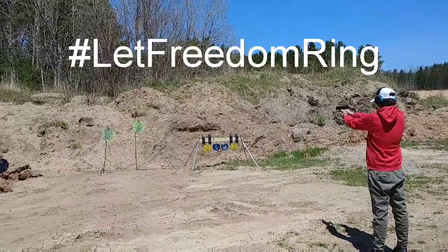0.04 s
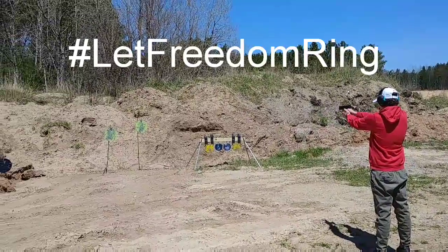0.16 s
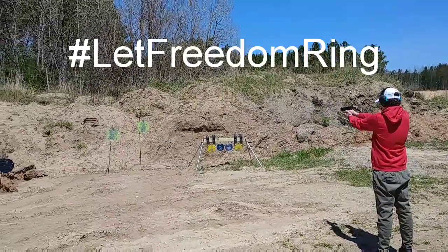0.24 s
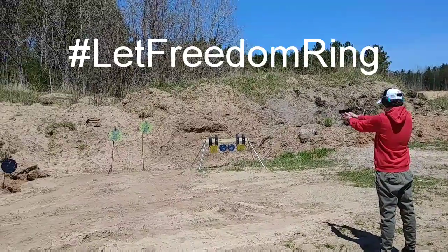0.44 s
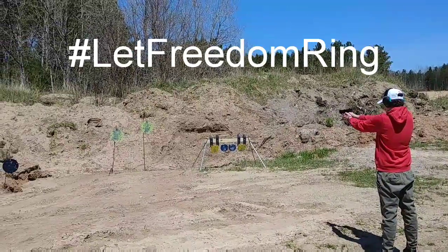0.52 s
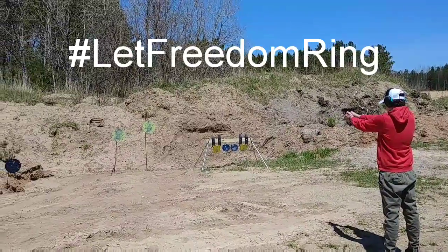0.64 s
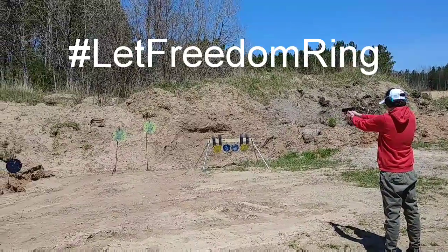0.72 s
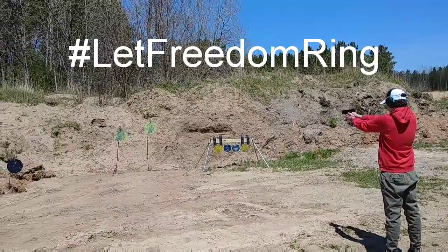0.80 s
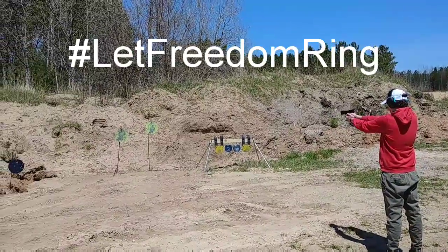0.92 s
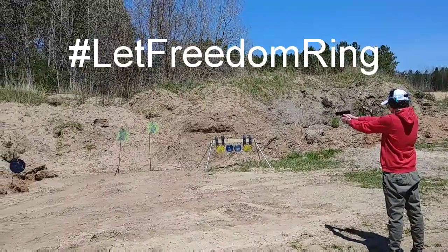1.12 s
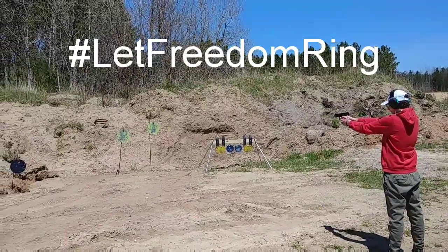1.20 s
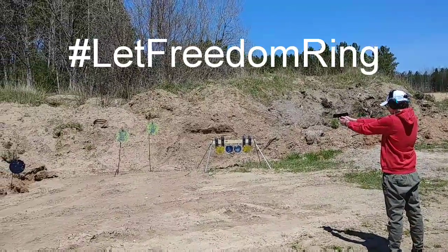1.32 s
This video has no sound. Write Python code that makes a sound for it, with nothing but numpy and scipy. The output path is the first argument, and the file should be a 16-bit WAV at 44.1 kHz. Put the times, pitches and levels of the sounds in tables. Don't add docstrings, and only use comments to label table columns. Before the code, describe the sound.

A handgun fires twice at an open dirt range, with bright metallic plate rings after each shot

```python
import sys
import numpy as np
from scipy import signal
from scipy.io import wavfile
from scipy.ndimage import uniform_filter1d, minimum_filter1d

SR = 44100
rng = np.random.default_rng(int(sys.argv[2]) if len(sys.argv) > 2 else 0)


def volts(x):
    e = np.asarray(x, float) / 20
    return 10 ** e


def materialize(psi):
    bounded = np.clip(np.atleast_2d(psi).T, -1, 1)
    quanta = np.round(bounded * 32767).astype(np.int16)
    wavfile.write(sys.argv[1], SR, quanta)


N = 59535
T = np.arange(N) / SR
LEFT_LAG_S = 0.0002931


def evened(x):
    return x / np.sqrt(np.mean(x ** 2) + 1e-20)


def read(points, hz):
    f, value = np.transpose(points)
    return np.interp(np.log(hz + 1), np.log(f + 1), value)


def since(s):
    return np.maximum(T - s, 0)


def add(mix, s, sound):
    part = mix[:, round(s * SR):][:, :sound.shape[1]]
    part += sound[:, :part.shape[1]]


def hiss(colour, patch_db, t60=None, ref_s=0):
    frames, hz = N // 64 + 5, np.fft.rfftfreq(256, 1 / SR)
    a, b, c, d, patches = rng.standard_normal((frames, 129, 5), dtype=np.float32).T
    patches = uniform_filter1d(patches, size=5, axis=0)
    patches = evened(uniform_filter1d(patches, size=9, axis=1))
    shape = volts(read(colour, hz))[:, None]
    same = 0.22
    shared, own = a + 1j * b, c + 1j * d
    left = shared * np.exp(-2j * np.pi * hz * LEFT_LAG_S)[:, None]
    right = same * shared + np.sqrt(1 - same ** 2) * own
    z = np.array([left, right]) * shape * volts(patch_db * patches) / np.sqrt(np.mean(shape ** 2))
    if t60:
        age = np.maximum(np.arange(frames) * 64 / SR - ref_s, -.4)
        z = z * volts(-60 * age / read(t60, hz)[:, None])
    return signal.istft(z, nperseg=256, noverlap=192)[1][:, :N] / 16


def burst(level_db, hz, length):
    u = T[:4000] / length
    edges = [0.72 * hz, min(1.39 * hz, 20000)]
    band = signal.butter(2, edges, "bandpass", fs=SR, output="sos")
    noise = signal.sosfilt(band, rng.standard_normal((2, 5000)))[:, 1000:]
    return volts(np.c_[level_db]) * u * np.exp(1 - u) * evened(noise)


# (frequency [Hz], density [dB per Hz])
WASH_COLOUR = [(40, -6.5), (120, 7), (250, -43.5), (600, -1), (1100, -10.5), (2000, -14), (3500, -36.5),
               (16000, -49)]
# (time [s], level [dB], frequency [Hz], length [s])
CASES = [
    (0.04, -42, 5700, 0.0015),
    (0.705, -46, 5200, .0015),
    (0.713, -47, 4300, .003),
]


def yard():
    late_echo = np.minimum(since(1.304) / 0.032, 1)
    out = volts(-36.5 + 4.5 * late_echo) * evened(hiss(WASH_COLOUR, 2.5))
    out += volts(-43 - 60 * T / 3.4) * np.sin(2 * np.pi * 1118 * T)
    for s, db, hz, length in CASES:
        add(out, s, burst([db, db], hz, length))
    return out


# (time [s], length [s], level [dB], frequency [Hz])
LOW_SWELLS = [
    (.27, 0.23, -27, 25),
    (0.67, 0.092, -33, 62),
    (0.022, 0.052, -40, 71),
    (0.38, 0.36, -42, 54),
    (1.0, 0.4, -47.5, 65),
]


def capsule():
    out = np.zeros((2, N))
    for row in SHOTS:
        t = since(row[0] + 0.0026)
        hz = 65 + (265 - 65) * np.exp(-t / 0.0049)
        level_db = np.c_[[-41, -11.5]] - 60 * t / 0.14
        out += volts(level_db) * np.sin(2 * np.pi * np.cumsum(hz * (t > 0)) / SR)
    for s, length, db, hz in LOW_SWELLS:
        swell = np.sin(np.pi * np.minimum(since(s) / length, 1))
        out[1] += volts(db) * swell * np.sin(2 * np.pi * hz * since(s))
    return out


# (frequency [Hz], density [dB per Hz])
FAR_COLOUR = [(60, -10), (350, -20.5), (600, 6.5), (1100, 0.5), (2200, -4.5), (7500, -22), (9000, -41),
              (16000, -48)]
# (left level [dB], right level [dB])
FAR_DB = [
    [-12, -19.5],
    [-18.5, -25],
]
# (frequency [Hz], 60 dB decay time [s])
FAR_T60 = [(150, .4), (700, 0.62), (2500, 0.44), (8000, 0.31)]


def far_tail(k, s, hold):
    rise = np.minimum(since(s) / .05, 1) ** 2
    return volts(np.c_[FAR_DB[k]]) * rise * hiss(FAR_COLOUR, 3.5, FAR_T60, hold)


# (delay after shot [s], left level [dB], right level [dB], frequency [Hz], length [s])
SLAPS = [
    (0.04, 29.5, 22.5, 1410, 0.0011),
    (0.069, 24, 21, 720, 0.0015),
    (.14, 9, 5.5, 692, 0.0098),
    (.0615, 23, 24, 3000, 0.0011),
    (0.11, 10, 9, 3300, 0.00081),
    (0.046, 19.5, 6, 780, 0.0035),
    (.055, 7.5, 4.5, 390, 0.0092),
    (0.0023, 21, 35.5, 353, 0.004),
]
# (frequency [Hz], density [dB per Hz])
NEAR_COLOUR = [(100, -8), (350, -3), (650, 7.5), (1500, 0.5), (4000, -5), (8000, -9.5), (10000, -34),
               (16000, -13.5)]


def blast(s, level_db):
    t, out = T[:600], np.zeros((2, N))
    u = t / np.c_[[.006, .004]]
    start_hz, end_hz = 6500, np.c_[[500, 400]]
    hz = start_hz * (end_hz / start_hz) ** np.minimum(u, 1) ** 1.6
    grit = .8 * uniform_filter1d(rng.standard_normal(hz.shape), size=3) * np.exp(-u)
    crack = np.sin(2 * np.pi * np.cumsum(hz * (1 + grit), axis=1) / SR) + grit
    envelope = np.minimum(t / .001, 1) ** 2 * np.exp(-u ** 6)
    add(out, s, volts(np.c_[level_db]) * crack * envelope)

    b = T[:6000] / 0.0091
    boom_hz = 129.3 + (316 - 129.3) * np.exp(-b / 1.48)
    boom = b * np.exp(1 - b) * np.sin(2 * np.pi * np.cumsum(boom_hz) / SR)
    add(out, s + .052, volts(np.c_[[1.5, -4.5]]) * boom)

    for delay, left_db, right_db, hz, length in SLAPS:
        add(out, s + delay, burst([left_db - 11, right_db - 14.5], hz, length))

    near_db = np.c_[[25.5, 26.5]] - 60 * since(s) / 0.099
    return out + volts(near_db) * (T > s + .001) * evened(hiss(NEAR_COLOUR, 1.6))


def ring(k, t, hz, level_db, t60, lobe):
    age = t - t[0]
    rise_s, ease_s = [0.0046, 0.0099][k], [0.16, 0.15][k]
    turn_db = [93, 121][k] * hz / 1000 * np.maximum(t, 0) ** 2 / (1 + (t / ease_s) ** 2)
    envelope = volts(-60 * t / t60 - turn_db) * (1 - np.exp(-age / rise_s))
    tone = envelope * np.exp(2j * np.pi * (hz * age + rng.random()))
    mics = volts(np.c_[level_db]) * np.exp(-2j * np.pi * hz * np.c_[[LEFT_LAG_S, 0]])
    return np.sqrt(2) * (mics * lobe * tone).real


# (left level [dB], right level [dB], 60 dB decay time [s],
# time the swing turns a quiet lobe to the microphones [s], 0 = never)
PLATE_A = [(-22, -24.5, 0.3, 0.37), (-23, -22.5, 0.78, 0.071), (-24, -20, 0.99, 0.074),
           (-25, -51, 0.52, 0.041), (-27.5, -44.5, 0.38, 0.21), (-26.5, -34, 0.38, 0.46),
           (-42, -33.5, 0.34, 0.22), (-36, -30.5, 0.48, 0.067), (-16, -27.5, 0.6, 0.205),
           (-25, -27.5, .36, 0.46), (-28.5, -17.5, 0.54, 0.383), (-22.5, -15, 0.39, 0.14),
           (-17, -49, 0.45, 0.533), (-78, -44.5, 0.21, 0.267)]
PLATE_B = [(-32, -37.5, .5, 0), (-7, -10.5, 0.83, 0), (-32.5, -29.5, 0.42, .92), (-36.5, -43.5, 0.38, 0),
           (-71, -42, 0.36, .9), (-12, -25.5, 0.65, 0), (-28, -34, .7, .9), (-17.5, -14, 0.5, 0.898),
           (-49, -40, 0.41, 0), (-36, -47, 1, 0.63), (-31.5, -31, 0.5, 0.876), (-28, -58, 0.97, 0),
           (-52, -42, 1, 0), (-31.5, -42, 1, 0.58)]
PLATE_A_HZ = [852, 1279, 1992, 2198, 3326, 3419, 3907, 4639, 5113, 6132, 7003, 7797, 9607, 11687]
PLATE_B_HZ = [865, 1993, 3077, 3420, 3726, 5085, 5736, 6967, 7972, 8975, 10856, 11277, 13024, 14746]
# (frequency [Hz], level [dB])
RIG_A = [(3442, -34), (3723, -64), (5730, -45), (7990, -35), (8288, -52), (9003, -43.5), (10022, -67),
         (10454, -42.5), (10892, -50), (11568, -33.5), (12893, -59), (13497, -64), (13642, -40),
         (15577, -39)]
RIG_B = [(1195, -40), (4703, -43.5), (5883, -44), (7533, -43.5), (8283, -47), (8592, -39), (9046, -43.5),
         (9773, -54.5), (10413, -45), (11042, -46), (11880, -52), (12482, -52), (12865, -47.5),
         (13730, -45)]
# (left level [dB], right level [dB])
SMACK_DB = [
    [17.5, 4.3],
    [15.5, 7.9],
]


def plate(k, hit, hold):
    now = hit + T[:24000]
    t = now - hold
    out = np.zeros((2, len(now)))
    add(out, 0, burst(SMACK_DB[k], 8000, .00025))

    pitches, modes, rig = [(PLATE_A_HZ, PLATE_A, RIG_A), (PLATE_B_HZ, PLATE_B, RIG_B)][k]
    back_gain, right_delay_s = [0.26, 0.16][k], [0.0064, 0.05][k]
    for hz, (left_db, right_db, t60, quiet) in zip(pitches, modes):
        face = np.tanh((now - quiet - np.c_[[0, right_delay_s]]) / 0.046)
        lobe = np.where(face < 0, back_gain, 1) * face + 0.085j
        out += ring(k, t, hz, [left_db, right_db], t60, lobe)

    for hz, db in rig:
        sway = np.cos(2 * np.pi * (rng.uniform(2.546, 5.7) * now + rng.random((2, 1))))
        out += ring(k, t, hz, [db, db], 0.6, 1 + 2.1 * sway)

    for place, size, rate, left, right in rng.random((22, 5)):
        sway = np.cos(2 * np.pi * ((1 + 4 * rate) * now + np.c_[[left, right]]))
        db = [-42.5, -52.5][k] + 2.5 * (2 * size - 1)
        out += ring(k, t, 8200 + 7600 * place, [db, db], 0.56, sway)
    return out


# (fired [s], left blast level [dB], right blast level [dB], plate heard [s],
# time at which ring levels hold [s])
SHOTS = [
    (.2188, 32, 37, .2624, .46),
    (.7853, 32, 37, .8233, 1.1),
]


def scene():
    out = yard()
    for k, (s, left_db, right_db, hit, hold) in enumerate(SHOTS):
        out += blast(s, [left_db, right_db])
        add(out, hit, plate(k, hit, hold))
        out += far_tail(k, s, hold)
    return out


def band_limit(x):
    return signal.sosfilt(signal.butter(12, 16430, fs=SR, output="sos"), x)


def record(dry):
    dry = signal.sosfilt(signal.butter(2, 45, "highpass", fs=SR, output="sos"), dry)
    peak = -minimum_filter1d(-abs(dry), size=89, axis=1)
    peak_db = 20 * np.log10(peak + 1e-9) - .4
    fall = T * 358
    over_db = np.maximum(np.maximum.accumulate(peak_db + fall, axis=1) - fall, 0)
    held = dry / volts(uniform_filter1d(over_db, size=89, axis=1)) + capsule()
    return band_limit(np.clip(held, -1, 1))


dry = scene()
out = record(dry)
materialize(out)
```